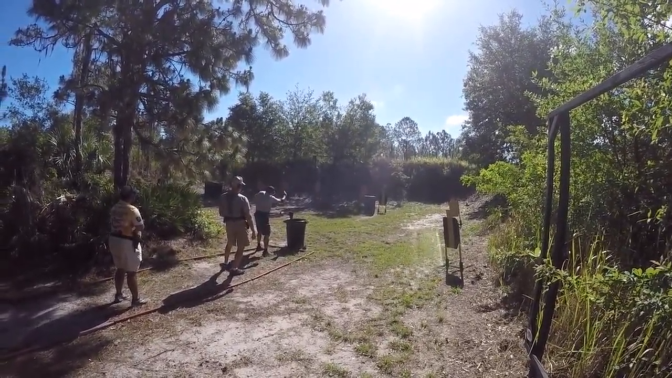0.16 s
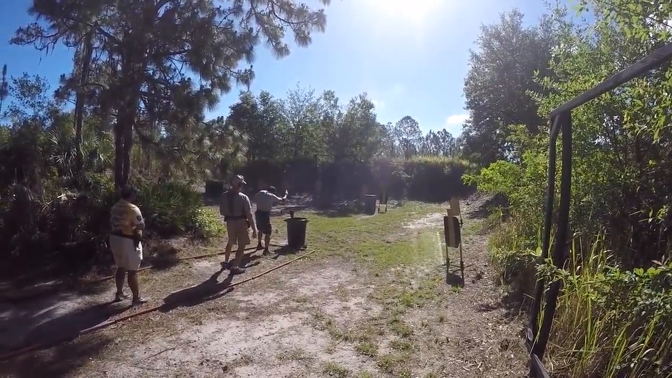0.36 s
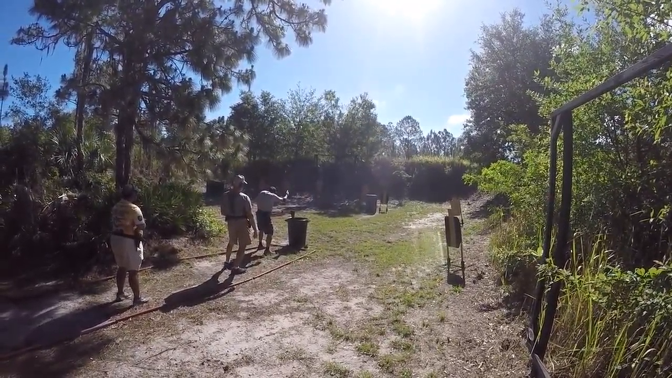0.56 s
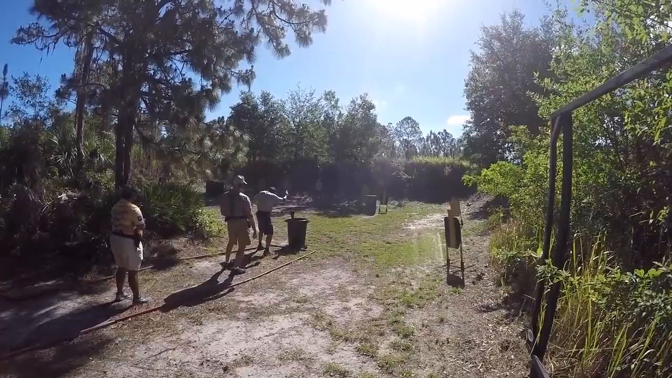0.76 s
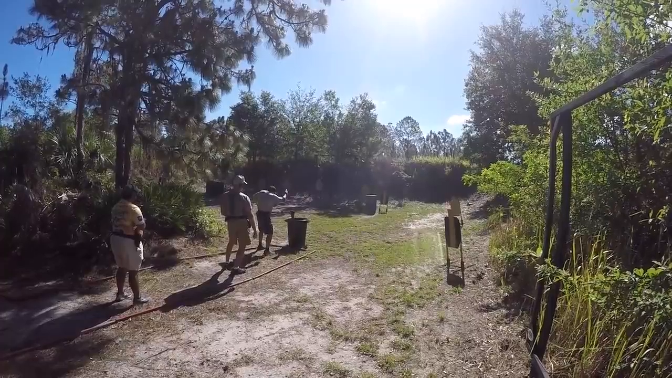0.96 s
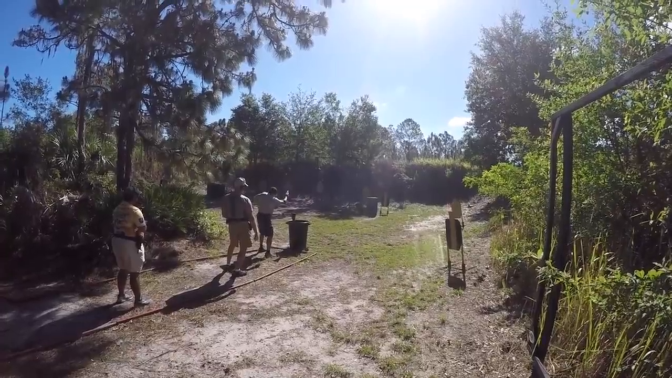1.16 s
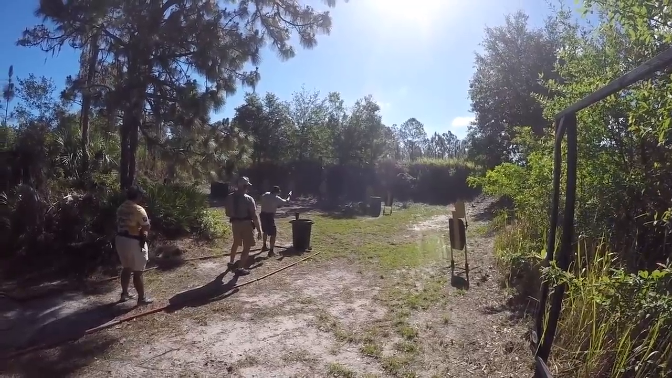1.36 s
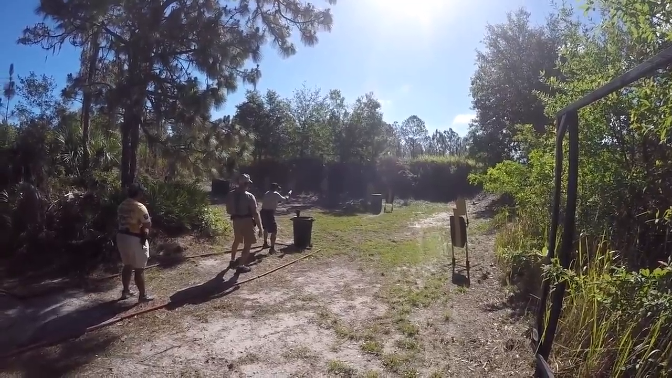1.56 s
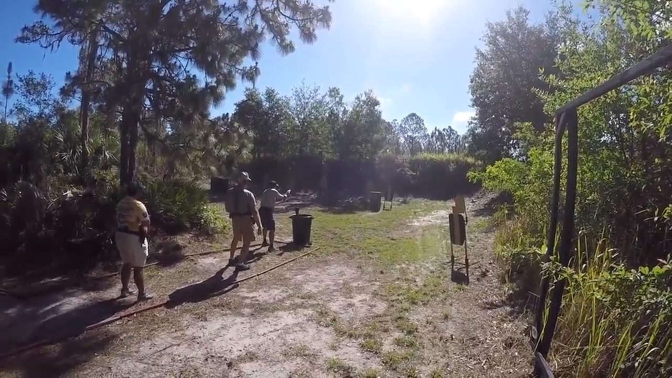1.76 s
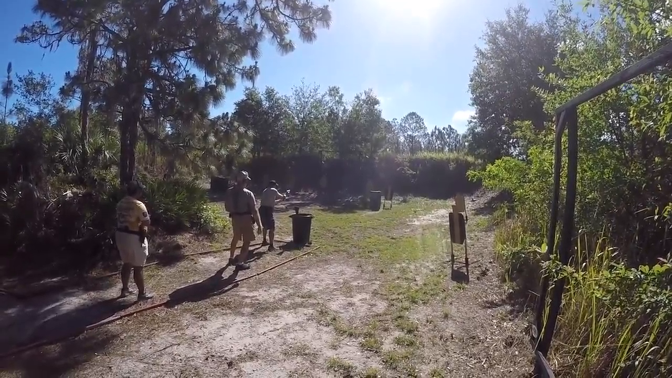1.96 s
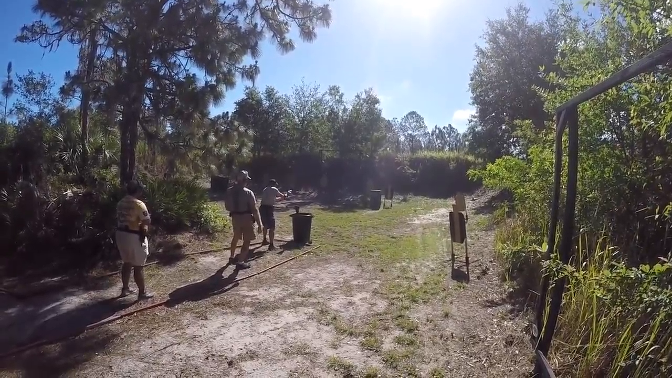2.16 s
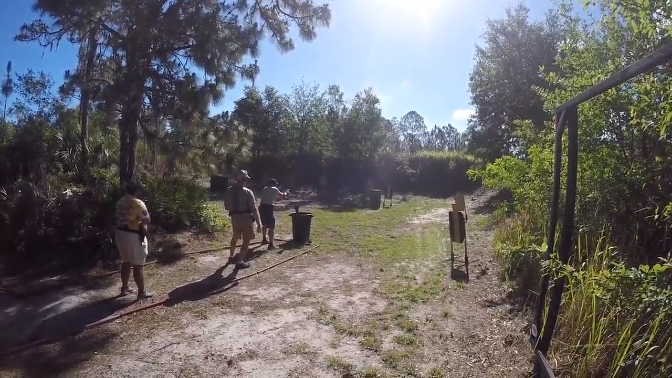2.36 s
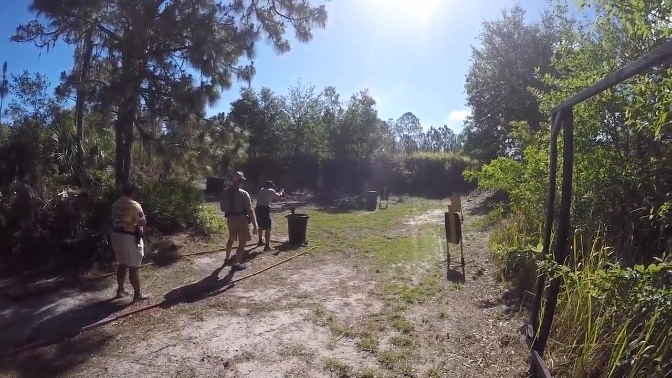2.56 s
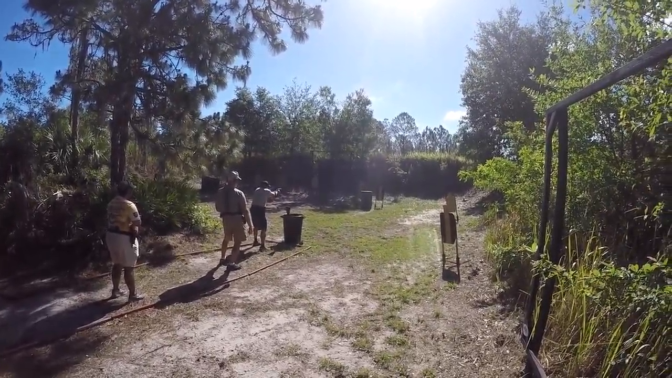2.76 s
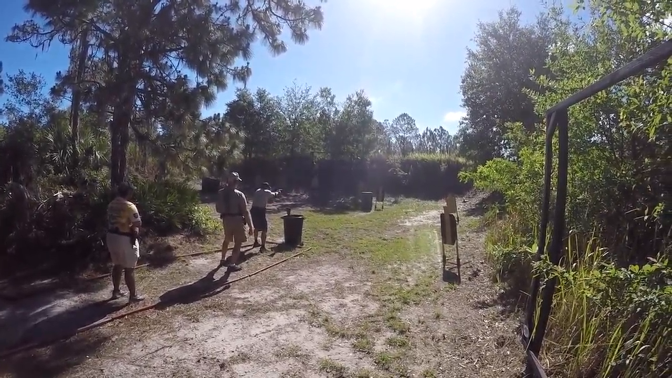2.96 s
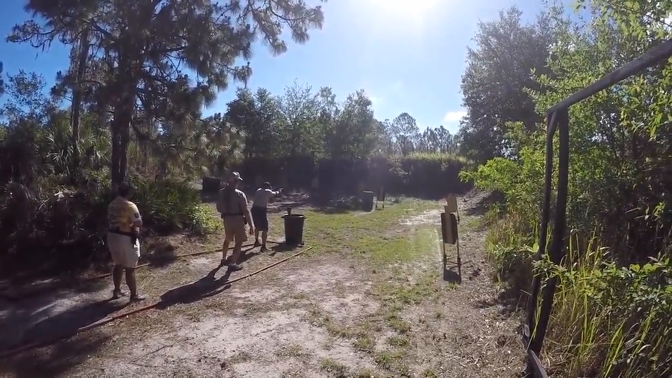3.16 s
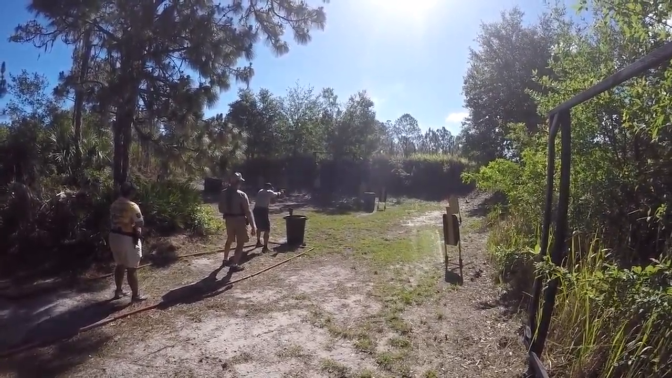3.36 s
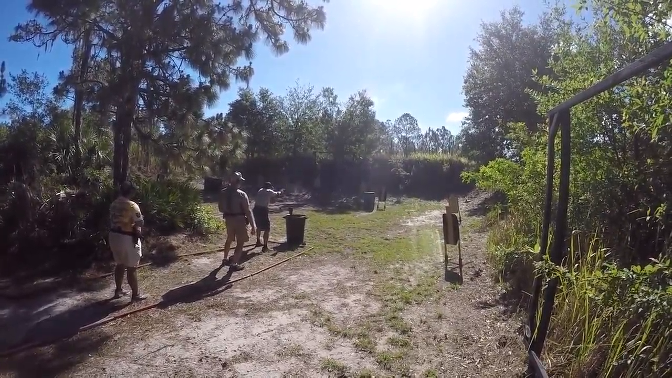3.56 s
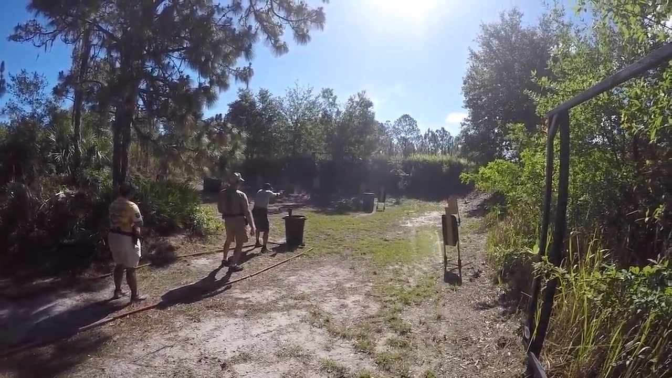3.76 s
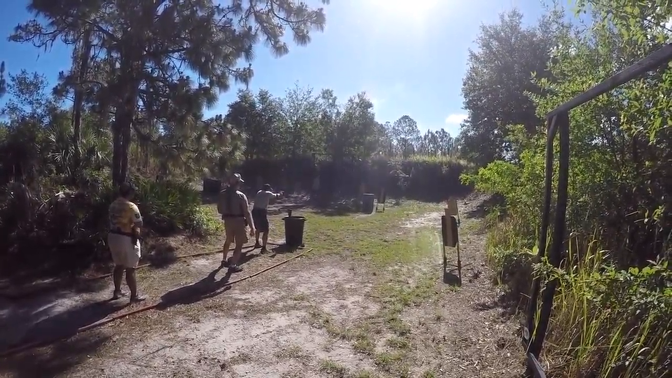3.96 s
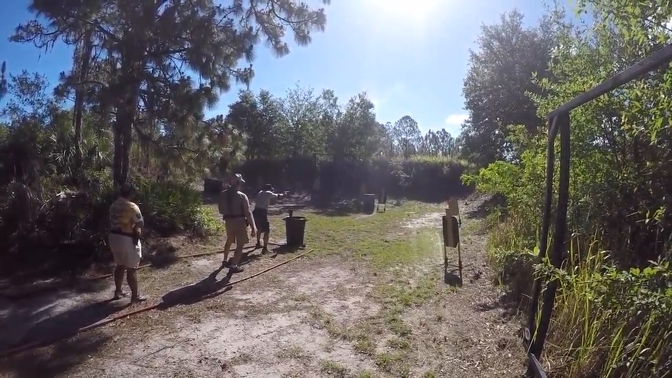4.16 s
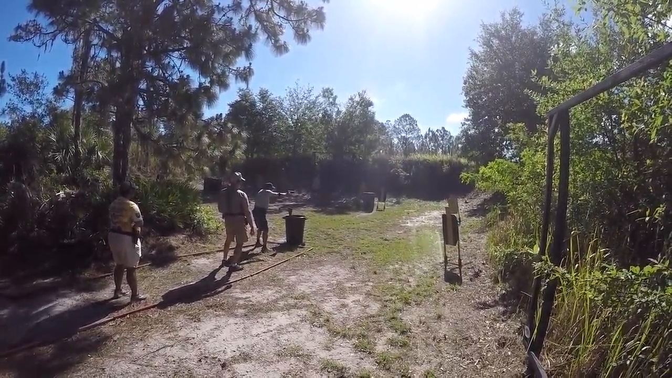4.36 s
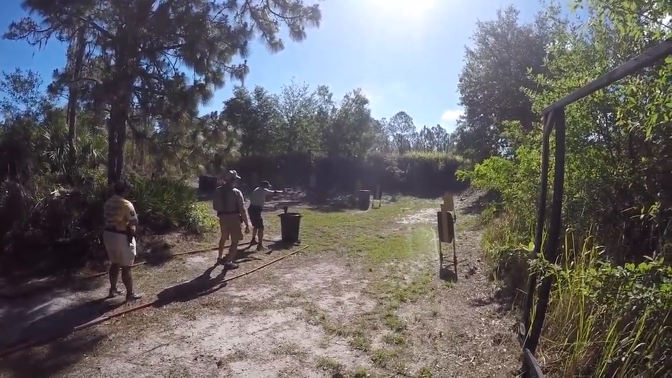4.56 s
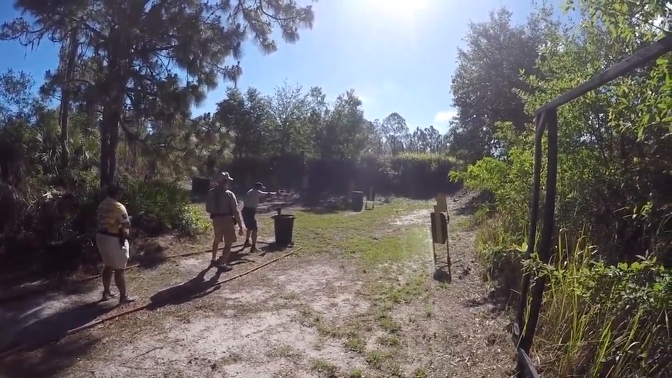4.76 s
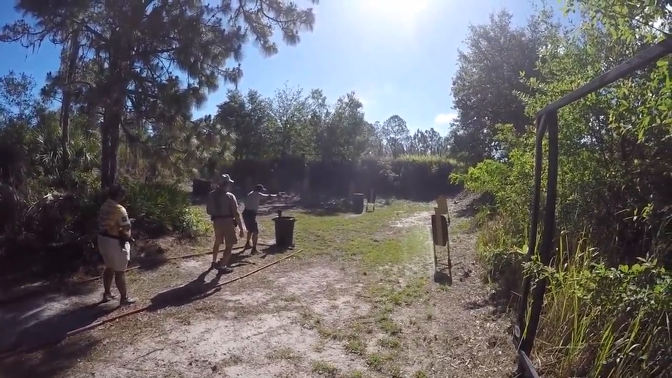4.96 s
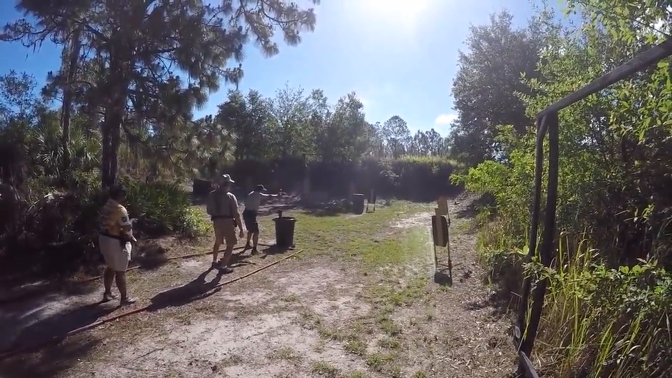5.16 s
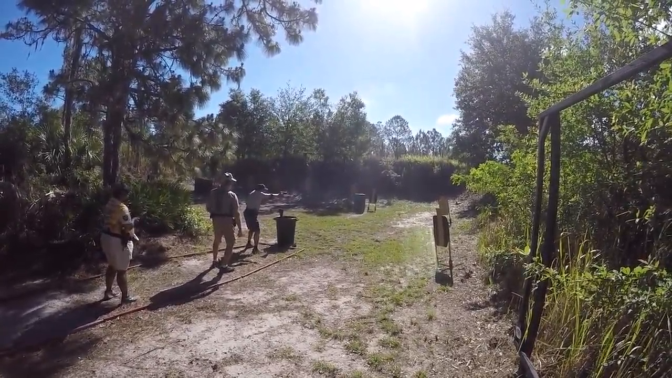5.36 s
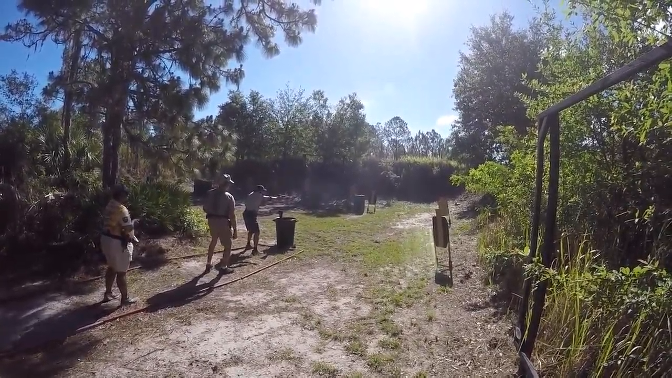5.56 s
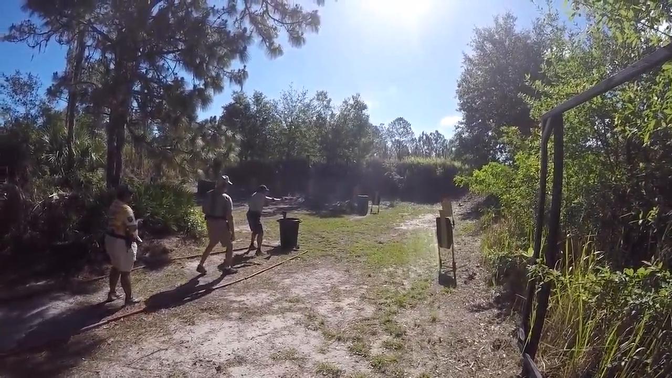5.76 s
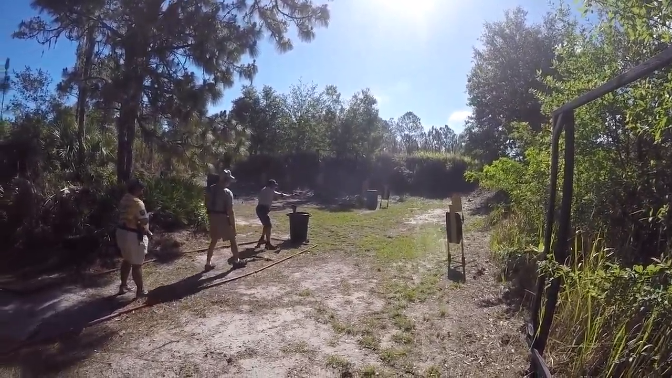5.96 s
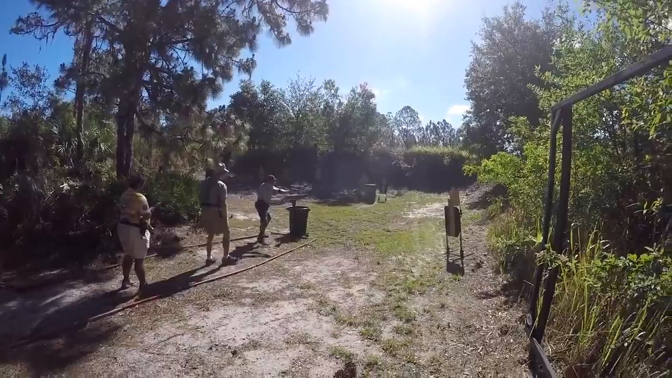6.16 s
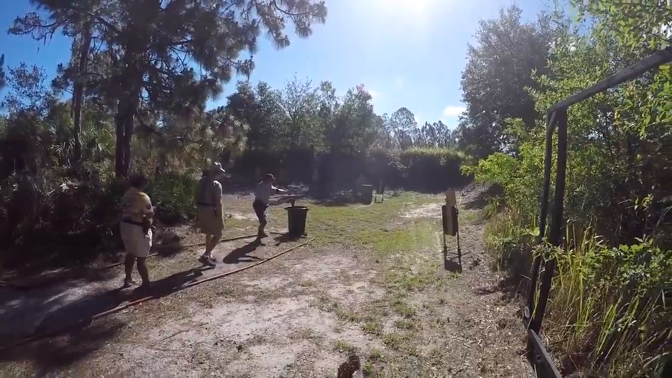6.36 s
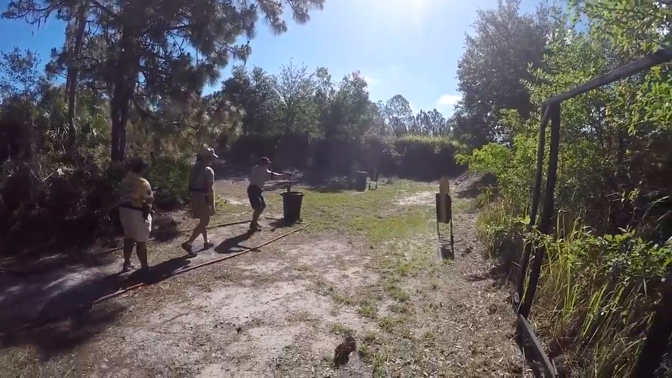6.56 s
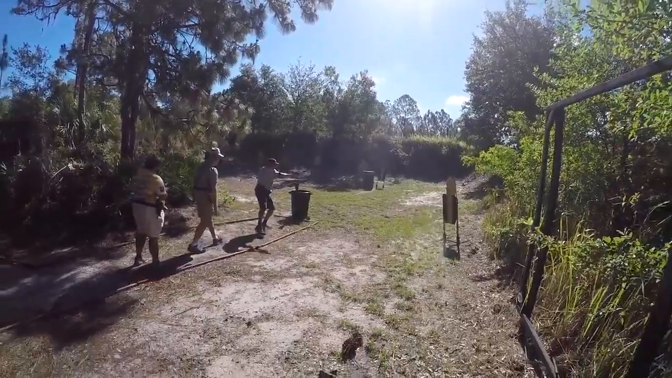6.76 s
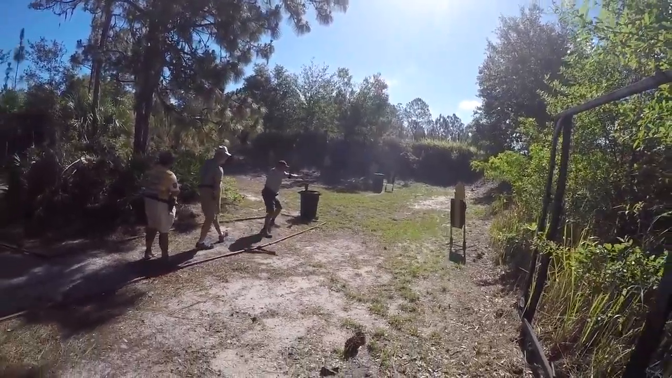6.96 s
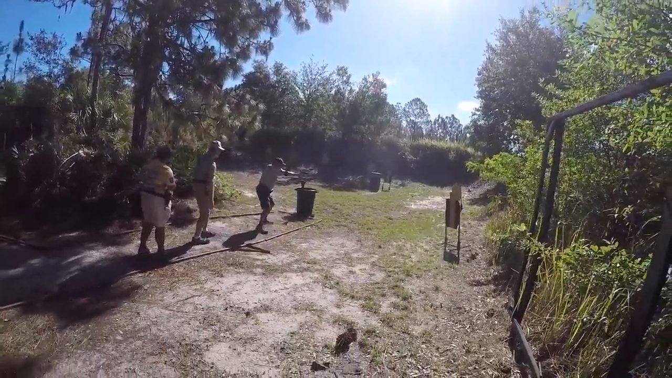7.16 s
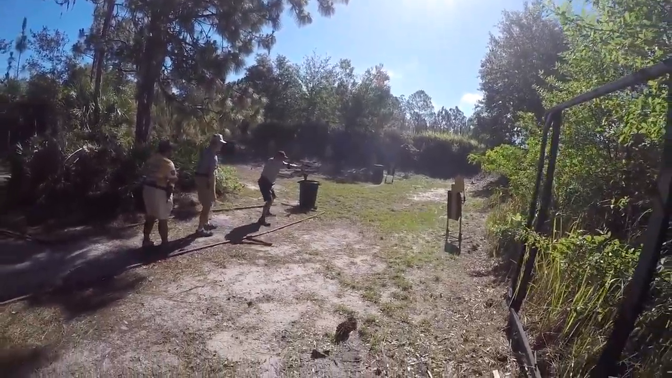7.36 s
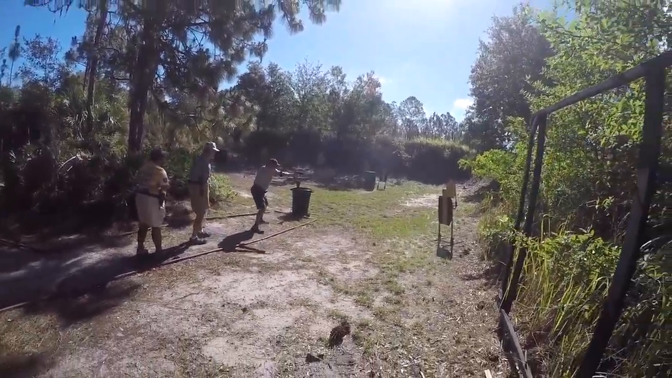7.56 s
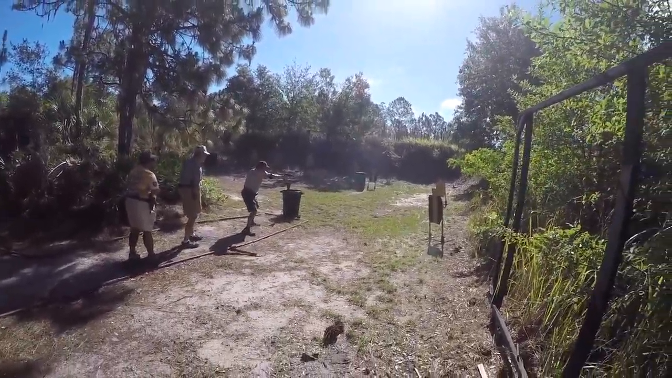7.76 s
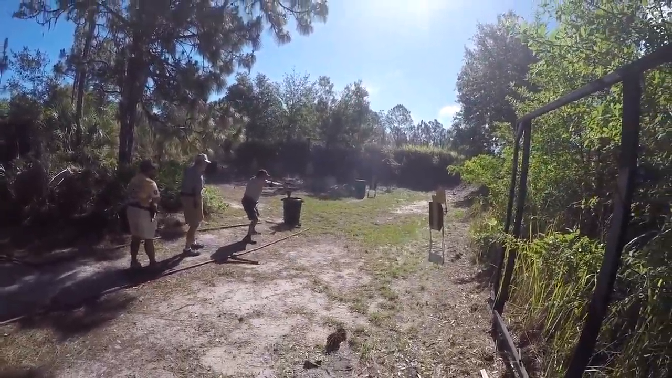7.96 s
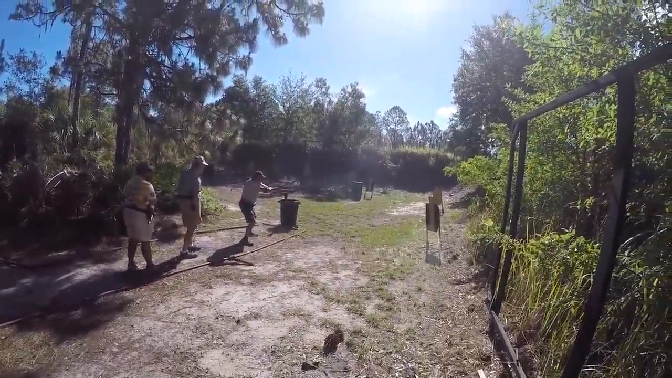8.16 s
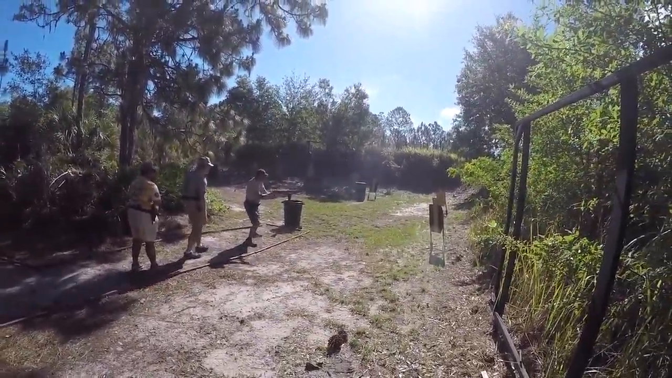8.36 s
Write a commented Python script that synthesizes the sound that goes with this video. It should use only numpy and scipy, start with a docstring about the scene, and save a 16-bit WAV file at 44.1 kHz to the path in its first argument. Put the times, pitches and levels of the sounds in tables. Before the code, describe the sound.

Small steel clacks, then seven loud pistol shots in two quick strings echo outdoors, with faint rumble and clothing rustle between them.

```python
"""A pistol match between earth banks, heard by a body-worn camera some metres behind the shooter.
From the start, air hisses and a double throb, likely the wearer's pulse, rocks the camera's mount.
The pistol's steel parts clack. Then four shots ring the camera's case, overload it and echo off banks
and trees; the camera turns itself down after each. The wearer walks a few steps, so the mount rumbles
and clothes rustle. Near the end of the walk, one more clack leads into the last three shots."""
import sys
import numpy as np
from scipy import signal
from scipy.fft import rfft, irfft, next_fast_len
from scipy.io import wavfile
from scipy.ndimage import map_coordinates

SR = 44100
rng = np.random.default_rng(int(sys.argv[2]) if len(sys.argv) > 2 else 0)


def dump(signal):
    """Clip the signal to [-1, 1] and save it as 16-bit WAV at the path in sys.argv[1]."""
    limited = np.clip(np.atleast_2d(signal).T, -1, 1)
    pcm = np.round(limited * 32767).astype(np.int16)
    wavfile.write(sys.argv[1], SR, pcm)


N = 370435

# Levels in the tables are relative. A t60 is the time a sound takes to fade by 60 dB.
# tone of the air and microphone hiss: f/Hz, level/dB
AIR_TONE = [(35, -35.5), (60, -4), (87, -1.5), (347, -13), (727, -15), (780, -16), (2060, -19), (2360, -18),
            (3750, -20.5), (14000, -31), (15000, -31)]
# tone of the shaking mount: f/Hz, level/dB
RUMBLE_TONE = [(10, -27.5), (20, -7), (27, -5), (33, -8), (45, -24.5), (70, -28), (130, -48), (400, -79.5)]
# pitches that the camera's case lifts or lowers: f/Hz, half width/Hz, level/dB
CASE_COLOUR = [(1340, 130, 5.5), (1440, 210, -4.5), (1670, 150, 4), (2540, 180, 5), (3216, 150, 5.5),
               (3640, 65, -6), (4090, 140, 4.5), (10560, 340, 3.5), (12600, 400, 0)]
# steel parts meeting: t/s, level/dB, frame against snap/dB, spring against snap/dB, t60/s
CLACKS = [(0.572, -47, -12, 1, 0.051), (0.5783, -43.5, -13, 6, 0.059), (0.585, -45, -8, -1, 0.096),
          (0.742, -53.5, 0.5, -7, 0.099), (0.7912, -63.5, 0, 12.5, 0.031), (0.871, -64.5, 7, 2, .03),
          (1.8048, -65, 9.5, 0, .05), (2.0628, -56.5, 1, -6, 0.2), (2.0771, -36.5, 9, -16, 0.029),
          (2.2689, -46.5, -2, -5, 0.17), (2.288, -39, 0, -17, 0.056), (2.2917, -24, -3.5, -22, 0.027),
          (7.15, -55, 3.5, 10, 0.024)]
# tone of the sharp steel snap: f/Hz, level/dB
SNAP_TONE = [(1000, -36), (1800, -25), (2550, -2.5), (3100, -8.5), (3550, 2.5), (4300, -6), (6300, -4.5),
             (7200, -6), (7650, -3.5), (8100, -7.5), (8700, -3.5), (9800, -19), (13000, -14),
             (15500, -23.5)]
# tone of the duller knock of the pistol's frame: f/Hz, level/dB
FRAME_TONE = [(500, -30), (900, -20), (1200, -2), (1600, -9), (1870, 4.5), (2150, -2), (2500, 5),
              (3100, -7), (3700, 2), (6000, -22)]
# tone of the buzzing spring: f/Hz, level/dB
SPRING_TONE = [(2000, -35.5), (2500, -12), (2750, 0), (2950, -13), (3150, -5.5), (3500, -18.5), (5000, -39)]
# ringing of the slide, the pistol's moving top: f/Hz, level/dB, t60/s
SLIDE_RING = [(2470, 1.5, .055), (3407, -3.5, 0.068), (3850, -5.5, .08), (7720, -0.5, .075),
              (8680, -7.5, .07)]
# how long sound lingers between the earth banks: f/Hz, t60/s
BAY_DECAY = [(100, 0.61), (400, .39), (1000, 0.33), (3000, 0.38), (7000, 0.37), (14000, 0.34)]
# the shots: t/s, blast level/dB, low push within the blast/dB, echo level/dB
SHOTS = [(3.5036, 1.5, -1, 3.5), (4.8408, 7.5, 4.5, 0), (5.1541, 6.5, -10, 2.5), (5.4432, 10, -13, 6.5),
         (7.3757, 7, 2.5, -3), (7.6731, 3, -1, -2), (7.9605, 7.5, -6, 2)]
# ringing of the camera's case under a blast: f/Hz, level/dB, t60/s
CASE_RING = [(458, -5.5, .017), (688, -12.5, .022), (1058, 0, 0.014), (1223, -1.5, 0.028),
             (1728.5, -1.5, 0.021), (2600, 4, 0.016), (2978, -3, 0.016), (3137, -6, 0.015),
             (3528, -6, 0.016), (3906, -9.5, 0.021), (4415, -14, 0.025), (5452, -15.5, 0.041),
             (7000, -16, 0.026)]
# tone of a shot's crack and of its wash off the ground: f/Hz, level/dB
CRACK_TONE = [(40, -4), (130, -8.5), (290, -15), (480, -11), (850, -2), (1500, -2), (2800, -0.5),
              (4200, -5), (5200, -7.5), (8000, -14.5), (11500, -17), (15000, -25)]
# echoes from barrel, targets and banks: delay/s, level/dB, centre f/Hz
ECHOES = [(.0075, -13.5, 1200), (0.0085, -14.5, 2700), (0.024, -16.5, 2953), (0.037, -23, 3200),
          (.053, -27.5, 2880), (.060, -25.5, 1380), (0.072, -26, 2623), (0.0867, -24.5, 950),
          (.088, -26.5, 2635), (.103, -30, 1804), (0.116, -31, 2570)]
# tone of the echo from the far trees: f/Hz, level/dB
FOREST_TONE = [(100, -24), (400, -12), (1000, -5), (2000, -1), (3000, -1.5), (4500, -6.5), (7000, -14.5),
               (14000, -30.5)]
# how long the trees' echo lingers: f/Hz, t60/s
FOREST_DECAY = [(200, 1.2), (2500, 1.23), (6000, 1.05), (12000, .7)]
# how the trees' echo swells in: t/s after the shot, share from 0 to 1
FOREST_ARRIVAL = [(0, 0.075), (.22, 0.007), (.31, 1)]
# strokes of cloth over the case: t/s, length/s, level/dB
RUBS = [(6.187, .03, -54), (6.293, 0.034, -58), (6.526, .17, -52), (6.716, 0.14, -57), (6.894, 0.19, -54.5),
        (7.29, .08, -57.5)]
# tone of the rubbing cloth: f/Hz, level/dB
CLOTH_TONE = [(200, -18), (800, -13.5), (1220, -1), (2200, -7), (3050, -0.5), (4700, -8), (5900, -7),
              (8800, -13), (11000, -12.5), (15000, -19.5)]

WALK_START_S, WALK_RISE_S, WALK_END_S = 5.69, 0.42, 7.3


def amp(db):
    """Turn decibels into a number to multiply by."""
    return 10 ** (np.asarray(db) / 20)


def unit(x):
    """Scale x to an average strength (rms) of 1."""
    return x / np.sqrt(np.mean(x ** 2) + 1e-20)


def along(points, hz):
    """Read between the rows of a (frequency, value) table, on a pitch-like log scale."""
    f, values = np.transpose(points)
    return np.interp(np.log(hz + 1), np.log(f + 1), values)


def wobble(rate, size):
    """A smooth random curve through `rate` points a second."""
    points = rng.standard_normal(int(size * rate / SR) + 4)
    return map_coordinates(points, [np.arange(size) * rate / SR])


def coloured(x, tone):
    """Give x a tone and the colour of the camera's case, at strength 1."""
    padded = next_fast_len(len(x) + 8192)
    f = np.fft.rfftfreq(padded, 1 / SR)
    case_db = sum(db * np.exp(-((f - hz) / width) ** 2) for hz, width, db in CASE_COLOUR)
    spectrum = rfft(x, padded) * amp(along(tone, f) + case_db)
    return unit(irfft(spectrum, padded)[:len(x)])


def noise(tone, size):
    """Fresh noise with the given tone, heard through the case."""
    return coloured(rng.standard_normal(size), tone)


def fade(t, t60):
    """Silence before t = 0, then a fall from full strength."""
    return (t >= 0) * np.exp(-np.log(1000) * np.abs(t) / t60)


def dying(x, t60s):
    """Let each frequency of x fade at its own speed."""
    hz, t, bands = signal.stft(x, SR, nperseg=256)
    faded = bands * fade(t, along(t60s, hz)[:, None])
    return signal.istft(faded, SR, nperseg=256)[1][:len(x)]


def swell(start, rise, end, fall_s):
    """A loudness curve that rises from start, holds until end, then dies away."""
    t = np.arange(N) / SR
    return np.clip((t - start) / rise, 0, 1) * np.exp(-np.maximum(t - end, 0) / fall_s)


def add(track, start, sound):
    """Mix a sound into the track, `start` seconds in."""
    part = track[round(start * SR):][:len(sound)]
    part += sound[:len(part)]


def hiss(level_db=-62.5):
    """The even noise of open air and microphone."""
    padded = next_fast_len(N)
    shape = amp(along(AIR_TONE, np.fft.rfftfreq(padded, 1 / SR)))
    spectrum = rfft(rng.standard_normal(padded)) * shape
    return amp(level_db) * unit(irfft(spectrum, padded)[:N])


def mount_rumble(standing_db=-46, walking_db=-34.5, uneven_db=1.5, top_hz=48):
    """The wearer's body shakes the soft mount: a little when standing, more when walking."""
    pace = swell(WALK_START_S, WALK_RISE_S, WALK_END_S, fall_s=0.3)
    swing = signal.hilbert(noise(RUMBLE_TONE, N))  # its abs() is the size of each swing
    evened = unit((swing / np.sqrt(np.abs(swing) + 0.1)).real)
    strength = (amp(standing_db) + amp(walking_db) * pace) * amp(uneven_db * wobble(6.5, N))
    return signal.sosfiltfilt(signal.butter(2, top_hz, fs=SR, output="sos"), strength * evened)


def pulse(first_s=0.287, period_s=0.459, gap_s=0.17, mount_hz=27, width_s=0.05, peak_db=-32):
    """Each heartbeat rocks the soft mount twice: a strong throb, then a weaker one."""
    out, t = np.zeros(N), np.arange(N) / SR
    for beat in np.arange(first_s, N / SR, period_s):
        for centre, db in [(beat, 0), (beat + gap_s, -9)]:
            near = np.abs(t - centre) < period_s / 2
            offset = t[near] - centre
            swing = np.cos(2 * np.pi * mount_hz * offset)
            out[near] -= amp(db) * swing * np.exp(-(offset / width_s) ** 2)
    return amp(peak_db) * out


def pistol_clacks(rise_s=0.0006, slide_db=-16, echo_db=-11):
    """Magazine and slide snap home: the frame knocks, the spring buzzes, steel rings, the banks echo."""
    out, t = np.zeros(N), np.arange(SR // 2) / SR
    for start, db, frame_db, spring_db, t60 in CLACKS:
        snap = noise(SNAP_TONE, len(t))
        knock = amp(frame_db) * noise(FRAME_TONE, len(t))
        buzz = amp(spring_db) * noise(SPRING_TONE, len(t))
        ring = sum(amp(level + rng.normal(0, 2)) * np.sin(2 * np.pi * hz * t) * fade(t, ring_t60)
                   for hz, level, ring_t60 in SLIDE_RING)
        clack = (snap + knock + buzz) * fade(t, t60) + amp(slide_db) * ring
        add(out, start, amp(db) * clack * (1 - np.exp(-t / rise_s)))
    out = signal.sosfilt(signal.butter(4, 900, "high", fs=SR, output="sos"), out)
    tail = dying(rng.standard_normal(len(t)), BAY_DECAY)
    echo = signal.fftconvolve(out, tail / np.linalg.norm(tail))[:N]
    return out + amp(echo_db) * echo


def blast(t, push_db, push_hz=130, crack_db=-3, rise_s=0.00015):
    """The shock wave cracks and rings the camera's case; the spreading gas adds one low push."""
    # every other ringing tone starts in the opposite direction
    ring = sum((-1) ** k * amp(db + rng.normal(0, 1)) * np.sin(2 * np.pi * hz * t) * fade(t, t60)
               for k, (hz, db, t60) in enumerate(CASE_RING))
    crack = amp(crack_db) * noise(CRACK_TONE, len(t)) * fade(t, t60=0.022)
    push = amp(push_db - 6) * np.sin(2 * np.pi * push_hz * t) * fade(t, t60=0.016)
    return (ring + crack + push) * (1 - np.exp(-t / rise_s))


def range_echoes(t, ground_db=-15, rise_s=0.004, forest_db=-33.5):
    """Ground and bushes send back a ragged wash, hard surfaces clear slaps, far trees a soft roll."""
    ragged = rng.standard_normal(len(t)) * amp(wobble(900, len(t)) + 0.95 * wobble(79, len(t)))
    wash = amp(ground_db) * dying(coloured(ragged, CRACK_TONE), BAY_DECAY)
    wash *= 1 - np.exp(-t / rise_s)
    for echo in ECHOES:
        add(wash, 0, slap(t[:SR // 4], *echo))
    roll = amp(forest_db) * dying(noise(FOREST_TONE, len(t)), FOREST_DECAY)
    roll *= amp(wobble(30, len(t)))
    return wash + roll * np.interp(t, *np.transpose(FOREST_ARRIVAL))


def slap(t, delay, db, hz):
    """One hard surface returns a short burst; its size sets the tone and the air dulls the highs."""
    tone = [(hz / 4, -24), (hz / 2, -12), (hz, 0), (hz * 2, -13), (hz * 5, -32)]
    burst = noise(tone, len(t)) * amp(db + rng.normal(1, 1))
    arrival = delay + rng.normal(0, 0.0008)
    return burst * fade(t - arrival, t60=0.033)


def shots():
    """Each shot is a direct blast followed by its echoes."""
    out, t = np.zeros(N), np.arange(3 * SR // 2) / SR
    for start, blast_db, push_db, echo_db in SHOTS:
        add(out, start, amp(blast_db) * blast(t[:SR // 8], push_db))
        add(out, start, amp(echo_db) * range_echoes(t))
    return out


def clothes_rustle(steady_db=-62, rise_s=0.024, fall_s=0.079, grain_db=1.5):
    """Walking rubs cloth over the case: a soft, steady rustle with a few louder strokes."""
    strokes = [amp(db) * swell(start, rise_s, start + length, fall_s) for start, length, db in RUBS]
    steady = amp(steady_db) * swell(WALK_START_S, WALK_RISE_S, WALK_END_S, fall_s)
    rubbing = np.linalg.norm(strokes + [steady], axis=0)  # their powers add up
    fibres = rng.standard_normal(N) * amp(grain_db * wobble(500, N))
    flutter = amp(wobble(19, N) + 0.9 * wobble(70, N))
    return rubbing * flutter * coloured(fibres, CLOTH_TONE)


def scene():
    """The shooting range and the wearer's own body, at one microphone."""
    return (hiss() + mount_rumble() + pulse() + pistol_clacks() + shots() + clothes_rustle())[None]


def auto_volume(x, threshold_db=-37, depth_db=24, attack_s=0.53, hold_s=0.17, recover_db_per_s=19):
    """The camera turns down while the sound is loud, waits, then creeps back up: quick shots add up."""
    block = 256  # samples
    no_bass = signal.sosfilt(signal.butter(2, 200, "high", fs=SR, output="sos"), x)
    peaks = np.abs(np.pad(no_bass, (0, -len(x) % block))).reshape(-1, block).max(1)
    cut_db, quiet_s, cuts, step_s = 0, 0, [], block / SR
    for peak_db in 20 * np.log10(peaks + 1e-9):
        cuts.append(cut_db)
        loud = np.clip(0.5 + (peak_db - cut_db - threshold_db) / 10, 0, 1)
        quiet_s = (1 - loud) * quiet_s + step_s
        recovering = np.clip((quiet_s - hold_s) / step_s, 0, 1)
        db_per_s = loud * (depth_db - cut_db) / attack_s - recovering * recover_db_per_s
        cut_db = max(cut_db + db_per_s * step_s, 0)
    return amp(-np.interp(np.arange(len(x)), np.arange(len(cuts)) * block, cuts))


def record(dry, ceiling=0.9, hardness=4, top_hz=15150):
    """The camera turns down too slowly for the blasts, squashes their peaks and cuts the top treble."""
    x = dry * auto_volume(dry[0])
    squashed = x / (1 + np.abs(x / ceiling) ** hardness) ** (1 / hardness)
    return signal.sosfilt(signal.ellip(12, 0.1, 80, top_hz, fs=SR, output="sos"), squashed)


dry = scene()
out = record(dry)
dump(out)
```